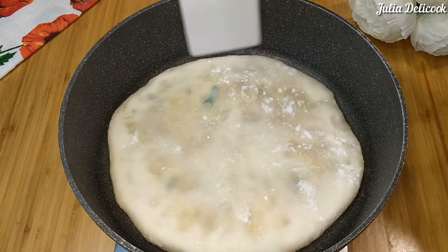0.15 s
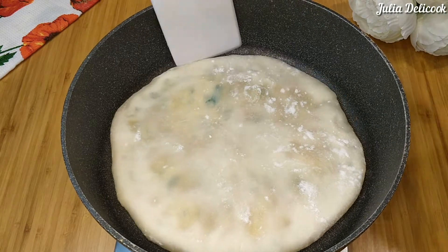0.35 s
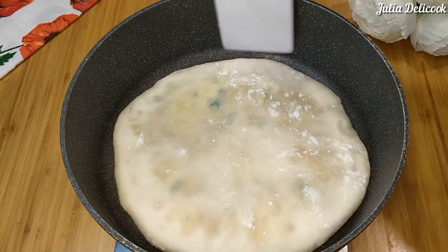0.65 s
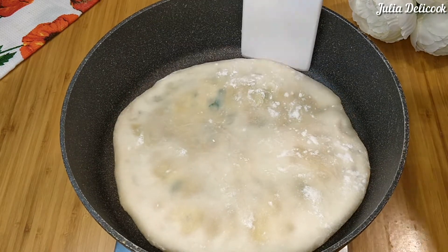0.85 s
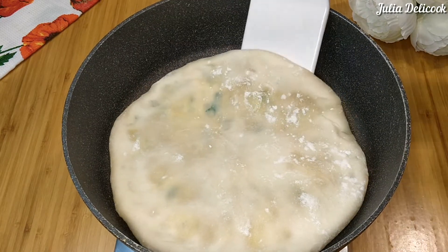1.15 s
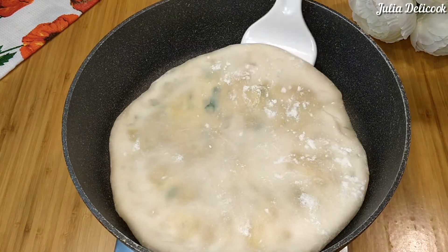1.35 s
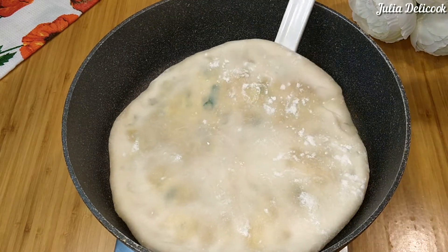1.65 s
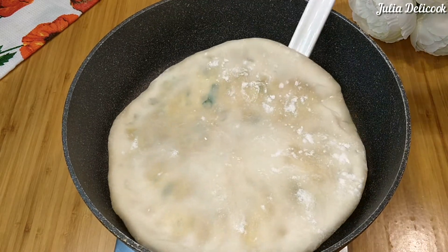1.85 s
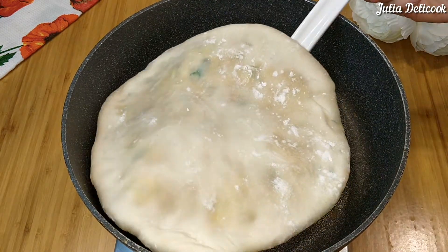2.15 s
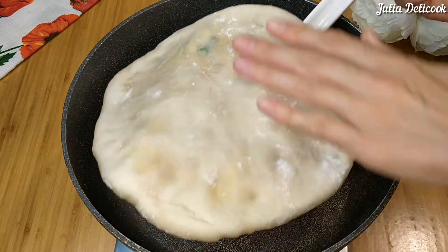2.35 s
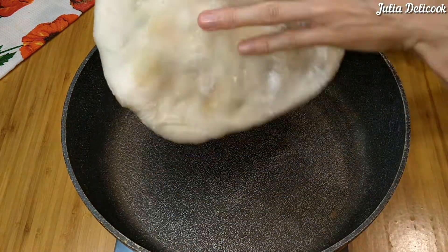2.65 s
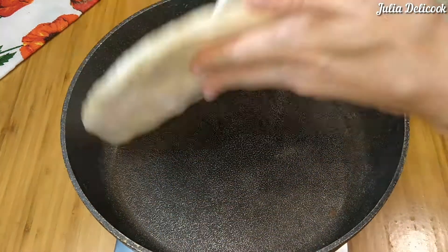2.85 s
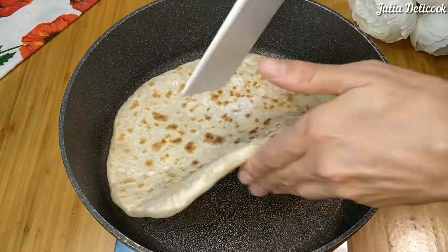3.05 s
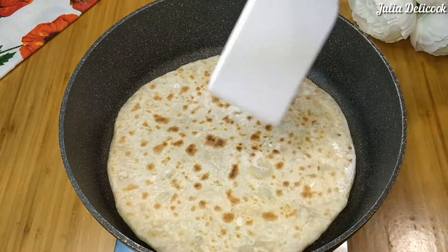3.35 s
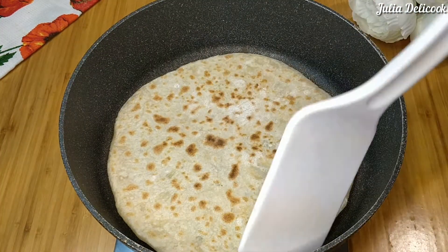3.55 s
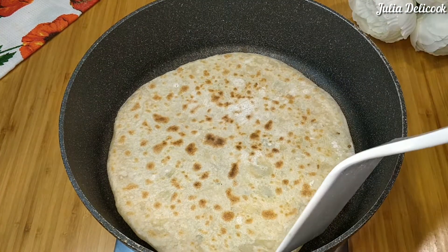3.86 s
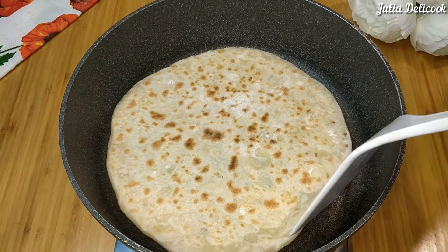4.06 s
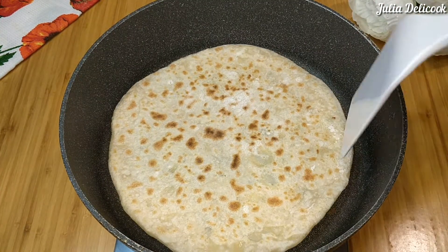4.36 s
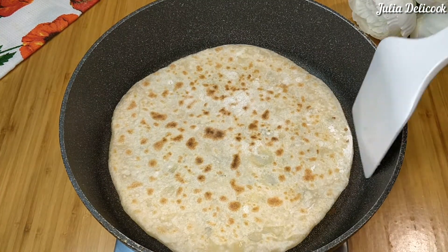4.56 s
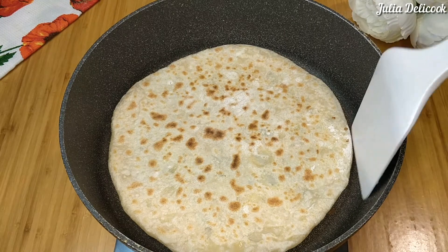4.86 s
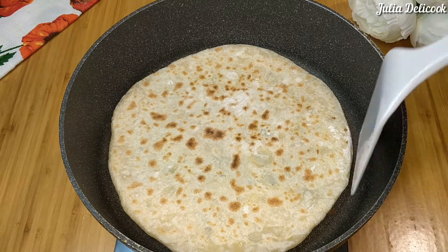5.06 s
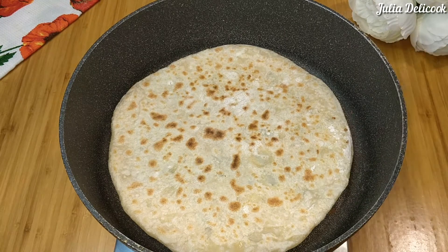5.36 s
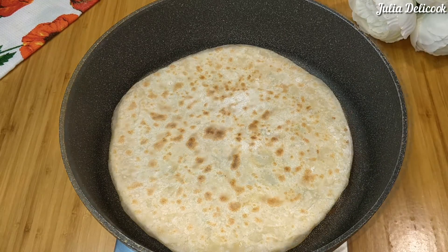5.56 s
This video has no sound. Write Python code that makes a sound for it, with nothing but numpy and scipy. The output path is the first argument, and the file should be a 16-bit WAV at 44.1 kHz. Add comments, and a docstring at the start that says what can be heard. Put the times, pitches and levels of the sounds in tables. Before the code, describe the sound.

Close stereo sound in a small kitchen with a short diffuse echo and a very faint, low room hush. From 0.1 to 1.7 s a plastic spatula works in a nonstick pan: irregular hard knocks with short, damped ringing and rough, grainy scrapes, clustered near 0.9 s and strongest around 1.4 s. A single dull low pop, mostly on the right, comes at 0.8 s. A knock at 1.85 s leads into a quiet stretch of faint floury brushing and dry ticks. At about 2.85 s the turned flatbread lands with a short brush and soft flops, settling again near 3.2 s. At 3.5 s the blade knocks and scrapes, then from 3.7 to 4.1 s judders in a low, buzzy, creaking groan of about sixty pulses a second. Separate taps and short scrapes follow at 4.1, 4.6 and 4.9 s, then very faint slides and soft settling until 5.5 s.

```python
"""Knocks, gritty scraping and a groaning judder: a plastic spatula works under a flatbread in a nonstick pan.
The bread is turned by hand and nudged into place: dry ticks, soft brushing, dull flops; one low pop is heard.
Blows and random slips ring the modes of pan and blade; stick-slip pulses ring the groan.
Filtered noise makes the brushing and the faint hush; a diffuse echo makes the small kitchen."""
import sys
import numpy as np
from scipy import signal
from scipy.fft import rfft, irfft, next_fast_len
from scipy.io import wavfile
from scipy.ndimage import uniform_filter1d

SR = 44100
rng = np.random.default_rng(int(sys.argv[2]) if len(sys.argv) > 2 else 0)


def master_out(mix):
    """Clip the mix to full scale and print it as 16-bit PCM to the path in sys.argv[1]."""
    frames = np.transpose(np.atleast_2d(mix))
    ceiling = np.clip(frames, -1, 1)
    pcm = np.round(ceiling * 32767).astype(np.int16)
    wavfile.write(sys.argv[1], SR, pcm)


N = 250929
T = np.arange(N) / SR
RING_T = T[:2 * SR // 5]  # 0.4 s

# Spatula knocks. Each row: time in s, base level in dB, brightness in dB per octave, extra pan wall in dB,
# extra hob thump in dB, extra edge tick in dB, chatter decay in s, three notes of the flexed blade in Hz.
KNOCKS = [(0.144, -32.5, -3.5, 3, -30, -5, 0.0048, 467, 1005, 3350),
          (0.356, -32.5, 0.5, 3.5, 2, 1, 0.0022, 517, 862, 3270),
          (0.627, -42.5, 4, -0.5, 0, 5, 0.0014, 479, 830, 2857),
          (0.672, -44.5, 2.5, -13.5, 15, -9, 0.0076, 576, 830, 3050),
          (0.893, -30, -2, -0.5, -22, 2, 0.0024, 520, 832, 2410),
          (0.903, -31.5, -4, 5.5, -2.5, 1, 0.011, 536, 984, 2210),
          (0.938, -31, -4, 0, -0.5, 3, 0.001, 385, 938, 4200),
          (1.188, -39.5, 2.5, 8.5, 13.5, 3, 0.0041, 474, 1177, 4160),
          (1.257, -32.5, 2.48, 3, 11, -5, 0.00065, 392, 1264, 6300),
          (1.4207, -26.5, 1.38, 4.5, 4.5, -1, 0.0068, 439, 1190, 5854),
          (1.852, -31.5, -2.5, 5, -1.5, -7, 0.0026, 422, 649, 4890),
          (3.533, -29, -2, -4.5, -13, 6, 0.0034, 418, 1497, 2460),
          (4.134, -35.5, 3.5, -1.5, 8.5, 0.5, 0.0059, 487, 646, 2617),
          (4.542, -39.5, 5, -11, -8, 5, 0.0037, 453.3, 1330, 3530),
          (4.619, -26.5, -8, -16, -42, -4, 0.00093, 411, 454.5, 2210),
          (4.858, -42.5, 1, -9.5, -23, 4, 0.0034, 460, 1020, 3350),
          (5.164, -50, 3, 4.5, -1, 6, 0.0079, 383, 840, 6930),
          (5.543, -71.5, 12, -0.5, 0, -10, 0.0034, 3190, 7200, 8460)]
# Slides of the blade on the coating. Each row: time of full force in s, attack in s, hold in s, release in s,
# base level in dB, brightness in dB per octave, extra pan wall in dB, extra blade ring in dB, blade note in Hz.
STROKES = [(0.134, 0.039, 0.021, 0.072, -34, .5, -1, 8, 448),
           (0.243, 0.037, 0.0063, 0.029, -42, 0.44, 1.5, 3.5, 453),
           (0.408, 0.11, 0.0089, 0.021, -42.5, -0.2, -0.5, -3, 478),
           (0.491, 0.061, 0.016, 0.3, -43.5, -1.3, 2, -13, 508),
           (0.606, 0.055, 0.028, 0.1, -34, 0.22, -3.5, 8.5, 557),
           (0.736, .03, .003, 0.042, -49, 1.5, -5.5, 5.5, 540),
           (0.834, 0.018, 0.012, 0.022, -41, -1.5, -11, -3, 382),
           (0.935, 0.074, 0.091, 0.027, -38.5, -0.5, 2.5, -6, 493),
           (1.02, 0.024, 0.032, 0.07, -37.5, 0, 4, 0, 498),
           (1.196, 0.072, 0.031, 0.04, -50.5, 0.2, 2, 2, 438),
           (1.297, 0.033, 0.051, 0.075, -38, -1, 7, -7, 407),
           (1.455, .04, 0.099, 0.063, -42, -0.7, 2.5, -11, 415),
           (1.544, .04, 0.014, 0.12, -34, -0.4, 7.5, -2.5, 408),
           (1.611, 0.075, 0.093, 0.075, -44, 0.97, 3, -3, 414),
           (3.561, 0.061, 0.081, 0.15, -47, -0.5, -1, 3, 353),
           (3.681, 0.024, 0.0056, 0.012, -32, -2, -3, 5, 364),
           (4.137, 0.082, 0.0082, .13, -43, 0.4, 7.5, 7, 448),
           (4.539, 0.009, 0.0086, 0.17, -48.5, -2, 2, 4, 434),
           (4.601, 0.017, 0.0094, 0.1, -40.5, -1, -6, -0.5, 406),
           (4.874, .015, 0.0058, 0.022, -47, -1, -17, -12, 427),
           (4.894, 0.03, 0.011, 0.058, -62.5, 3, 1.5, -2, 440),
           (4.978, 0.058, 0.027, 0.14, -69, 3, -8, -0.5, 446),
           (5.22, 0.075, .005, 0.11, -53, -0.5, 5, 5.5, 370),
           (5.307, 0.14, 0.013, 0.25, -60, 1.53, -2.5, 0, 384)]
# Pushes that make the blade judder along the pan wall. Each row: time of full force in s, attack in s,
# hold in s, release in s, level in dB.
JUDDER_PUSHES = [(3.75, 0.015, 0.15, 0.008, -32.5), (3.836, 0.04, .005, 0.039, -28.5),
                 (3.933, 0.019, 0.04, 0.046, -23.5), (4.002, 0.074, .14, 0.015, -26),
                 (4.026, 0.037, 0.048, 0.039, -22.5)]
# Floury bread brushing blade and pan. Each row: time of full force in s, attack in s, hold in s,
# release in s, level in dB.
BRUSHES = [(1.92, 0.24, .01, 0.28, -60), (2.04, .05, 0.032, 0.054, -66), (2.53, 0.053, .003, 0.035, -61.5),
           (2.72, 0.29, 0.074, .05, -67.5), (2.846, 0.021, 0.024, 0.021, -40),
           (2.9, 0.028, 0.027, 0.082, -51), (3.07, 0.1, 0.057, .12, -69.5), (3.218, 0.04, .002, .03, -55)]
# Bread settling. Each row: time in s, level in dB of hob, of pan bottom, of pan wall.
FLOPS = [(2.868, -44.5, -63, -45.5), (2.893, -49.5, -35, -49.5), (3.214, -59, -51, -52),
         (5.242, -46, -53, -76), (5.291, -51, -54, -70)]
# Dry crust ticks. Each row: time in s, level in dB.
TICKS = [(1.908, -50), (2.0294, -41.5), (2.5133, -44.5), (2.739, -48), (3.2173, -46), (3.803, -44)]
# Modes of the pan on its hob. Each row: frequency in Hz, relative level in dB, t60 in s.
PAN_MODES = [(73.9, 4.5, 0.41), (170.2, -5.5, 0.56), (370, -16, 0.066), (395.8, -2, 0.098),
             (458.9, -4, 0.2), (549, 4, 0.024), (559, -5.5, 0.16), (698, -2.5, 0.053), (772, -8, 0.15),
             (840, 0, 0.09), (931, -4, 0.083), (998.6, 0, 0.066), (1190, 0.5, 0.04), (1354.6, -3.5, 0.11),
             (1512, -22, 0.067), (1620, -33, 0.14), (2177, -9, 0.11), (2590, -14, 0.097), (2797, -7, 0.055),
             (3160, -4.5, 0.034), (3270, -15, 0.52), (3445, 4.5, 0.036), (3780, -3.5, 0.046),
             (4910, -7, .1), (5830, -11, 0.041), (5754, -12.5, 0.21), (6520, -6, 0.078), (6910, -6.5, 0.11),
             (7060, -1, 0.028), (8270, -5, 0.14)]
# Modes of the blade's groan against the pan. Each row: frequency in Hz, relative level in dB, t60 in s.
GROAN_MODES = [(172.5, -21, 0.47), (402.2, 1, 0.25), (456, -1.5, 0.13), (520.6, -6.5, 0.15),
               (597.5, -10.5, 0.07), (830, -14, 0.043), (1038, -26, 0.18), (1160, -16, 0.0083),
               (1427, -37, 0.14)]
# Registers of the ringing body: hob, pan bottom, pan wall, blade, coating, edge. Each row: low edge in Hz,
# high edge in Hz, dense modes relative to clear ones in dB, t60 of the dense modes in s.
REGISTERS = [(50.6, 305, -7, 0.25), (322, 743, -6, 0.048), (560, 2110, -3.5, 0.061),
             (2320, 3460, 3.5, 0.032), (3700, 9290, 10.5, 0.017), (11380, 17200, 0, 0.03)]
# Share of a knock in each register, in dB.
KNOCK_SHARES_DB = (-16.5, 0.5, -2.5, -13, -4.5, -23.5)
# Share of a stroke in each register, in dB.
STROKE_SHARES_DB = (-20, -3.5, -8.5, -16.5, -12, -20.5)
# Colour of the bread's brush. Each row: frequency in Hz, relative level in dB.
CRUST_COLOUR = [(300, -2.5), (1400, 0.5), (2500, -9.5), (5000, -2.5), (8000, -4), (10000, -14.5),
                (13000, -3.5), (16000, -6.5)]
# Colour of the kitchen hush. Each row: frequency in Hz, relative level in dB.
HUSH_COLOUR = [(15, -35), (25, -2), (76, -5.5), (120, -15), (161, -7.5), (200, -19.5), (309, -9.5),
               (451, -24), (591, -14), (754, -24.5), (887, -25.5), (2000, -36.5), (7310, -38.5),
               (8360, -38.5), (16000, -57)]
# Colour of the microphone. Each row: frequency in Hz, gain in dB.
MICROPHONE = [(700, 0), (1150, -3), (1700, -0.5), (2200, 0), (3300, 1.5), (4400, -1), (5500, -2),
              (8000, -1), (10500, -2), (13000, 0.5)]
# The two microphone ports. Each row: frequency in Hz, left minus right gain in dB.
BALANCE_DB = [(100, 1.5), (450, 0), (800, 6), (1300, 7.5), (2200, -1), (3300, 6.5), (6000, -1.5),
              (8200, -0.5), (10000, -1.5), (13000, 6.5), (16000, 17.5)]


def undb(db):
    """Decibels to gain."""
    return 10 ** (np.asarray(db) / 20)


def unit(x):
    """Scale to rms 1."""
    return x / np.sqrt(np.mean(x ** 2) + 1e-20)


def passband(lo, hi, order):
    """Sections of a Butterworth band-pass."""
    return signal.butter(order, [lo, min(hi, .45 * SR)], "band", fs=SR, output="sos")


def band(x, lo, hi, order):
    """Causal band-pass."""
    return signal.sosfilt(passband(lo, hi, order), x)


def colour(x, points):
    """Shape a spectrum by (Hz, dB) points, interpolated over log frequency."""
    hz, db = np.transpose(points)
    size = next_fast_len(N + len(RING_T))
    f = np.maximum(np.fft.rfftfreq(size, 1 / SR), 1)
    gain = undb(np.interp(np.log(f), np.log(hz), db))
    return irfft(rfft(x, size) * gain, size)[..., :N]


def pair(size, side):
    """Left and right noise with a common part."""
    mid, diff = rng.standard_normal((2, size))
    return unit(np.array([mid + side * diff, mid - side * diff]))


def ring(force, response):
    """Convolve a force with a response, cut to the force's length."""
    return signal.fftconvolve(np.atleast_2d(force), response, axes=-1)[:, :np.shape(force)[-1]]


def add(out, s, x):
    """Mix a sound in at time s."""
    i = int(s * SR)
    out[:, i:i + x.shape[-1]] += x[:, :N - i]


def fade(t60):
    """Exponential decay."""
    return np.exp(-np.log(1000) * RING_T / max(t60, 1e-3))


def gesture(t, s, attack_s, hold_s, release_s):
    """Gain of one push: gains 20 dB per attack time, holds, loses 20 dB per release time."""
    early = np.maximum(s - t, 0)
    late = np.maximum(t - s - hold_s, 0)
    steps = early / max(attack_s, 1e-3) + late / max(release_s, 1e-3)
    return undb(-20 * np.minimum(steps, 10))


def gestures(rows):
    """Gain of a table of pushes, added in power."""
    return np.sqrt(sum((undb(db) * gesture(T, *shape)) ** 2 for *shape, db in rows))


def tilt(db_per_octave, pivot_hz=456):
    """Level offset of each register in dB, sloping about the pivot."""
    return db_per_octave * np.log2([np.sqrt(lo * hi) / pivot_hz for lo, hi, *_ in REGISTERS])


def hush(level_db=-61.5, waver_db=1):
    """Faint room noise, partly common to both sides, its level wavering a little."""
    air = unit(colour(pair(N, side=0.48), HUSH_COLOUR))
    waver = unit(band(rng.standard_normal(N), 0.11, 10, order=1))
    return air * undb(level_db + waver_db * waver)


def kitchen(x, wet_db=-13, low_t60=0.39, high_t60=0.32, build_s=0.0068):
    """Short diffuse echo of a small, hard room: decaying noise, nearly mono in the bass."""
    high = band(pair(len(RING_T), side=0.79), 500, 14040, order=1) * fade(high_t60)
    low = band(pair(len(RING_T), side=0.1), 100, 410, order=1) * fade(low_t60)
    tail = (high + low) * (1 - np.exp(-(RING_T / build_s) ** 2))
    return x + undb(wet_db) * ring(x, tail / np.linalg.norm(tail[0]))


def low_pop(s=.812, ports_db=(-38, -21.5), snap_s=.00005, sag=0.29, sag_s=0.0028, fall_s=.016):
    """One dull pop, mostly on the right: the pressure sags a little, snaps up and relaxes."""
    t = T - s
    shape = np.where(t < 0, sag * np.exp(-np.abs(t) / sag_s), np.exp(-np.abs(t) / fall_s))
    return undb(ports_db)[:, None] * np.tanh(t / snap_s) * shape


def ringing(table):
    """Each mode of a table as a decaying sine; alternate rows have opposite sign."""
    return [(hz, (-1) ** k * undb(db) * fade(t60) * np.sin(2 * np.pi * hz * RING_T))
            for k, (hz, db, t60) in enumerate(table)]


def pan_body(modes, note_db=4, note_t60=0.11, place_db=2.0):
    """Pan and blade together: returns a function giving the register responses of one contact spot."""
    note = undb(note_db) * fade(note_t60)
    registers = [(lo, hi, undb(dense_db), fade(dense_t60),
                  passband(lo, hi, order=3), passband(0.74 * lo, 0.86 * hi, order=2))
                 for lo, hi, dense_db, dense_t60 in REGISTERS]

    def spot(notes_hz=()):
        """Pan modes, the flexed blade's notes, and dense damped modes as decaying noise."""
        tones = modes + [(hz, note * np.cos(2 * np.pi * hz * RING_T)) for hz in notes_hz]
        # each spot pushes the modes a little differently
        pushes = undb(place_db * rng.standard_normal(len(tones)))
        body = []
        for lo, hi, dense_gain, decay, inner, outer in registers:
            clear = unit(sum(push * tone for push, (hz, tone) in zip(pushes, tones) if lo <= hz < hi))
            # short waves reach the two ports out of step
            noise = pair(len(RING_T), side=min(0.38 + lo / 4000, 1))
            dense = unit(signal.sosfilt(inner, noise * decay))
            body.append(signal.sosfilt(outer, clear + dense_gain * dense))
        return body
    return spot


def strike(force, response, db):
    """A blow into one register, its loudest 8 ms at the given level."""
    x = ring(force, response)
    power = uniform_filter1d(np.mean(x ** 2, axis=0), size=353)
    return x * undb(db) / np.sqrt(power.max())


def bread(body, grain_db=4, tick_t60=0.013):
    """Floury crust brushes and ticks as grainy noise; soft dough flops as blows on hob and pan."""
    dry = unit(pair(N, side=1.0) * undb(grain_db * rng.standard_normal(N)))
    contact = gestures(BRUSHES)[None]
    for s, db in TICKS:
        add(contact, s, undb(db) * fade(tick_t60)[None])
    out = unit(colour(band(dry, 330, 15700, order=1), CRUST_COLOUR)) * contact
    blow = 1. * (RING_T == 0)
    for s, *levels_db in FLOPS:
        for db, response in zip(levels_db, body):
            add(out, s, strike(blow, response, db))
    return out


def judder(slip_hz=57.8, jitter=0.0492, scatter_db=2, rub_share=.35, low_hz=300, soft_hz=1100,
           hiss_db=-34, grain_db=4):
    """The flexing blade sticks and slips some sixty times a second, groaning against the pan."""
    t = T[:SR // 2]
    chance = rng.standard_normal((40, 2))
    times = np.cumsum(np.exp(jitter * chance[:, 0])) / slip_hz
    slips = np.histogram(times, len(t), (0, t[-1]), weights=undb(scatter_db * chance[:, 1]))[0]
    rub = rub_share * np.sqrt(slip_hz / SR) * rng.standard_normal(len(t))
    force = band(slips + rub, low_hz, soft_hz, order=1)
    groan = ring(force, sum(tone for hz, tone in ringing(GROAN_MODES))[None])
    # level the swing: the hand's pressure alone sets its size
    power = uniform_filter1d(uniform_filter1d(groan ** 2, size=1100), size=1100)
    groan /= np.sqrt(power + 1e-9)
    # the grainy coating hisses under the sliding edge
    grains = pair(len(t), side=0.89) * undb(grain_db * rng.standard_normal(len(t)))
    hiss = unit(band(grains, 760, 9200, order=2))
    out = np.zeros((2, N))
    first_s, first_attack_s = JUDDER_PUSHES[0][:2]
    add(out, first_s - 2 * first_attack_s, groan + undb(hiss_db) * hiss)
    return out * gestures(JUDDER_PUSHES)


def scraping(spot, grains_per_s=1100, spread_db=5, patchy_db=0.5, stutter=0.28, pressed_t60=0.34,
             force_powers=(.7, 1.01, 1.05, 1.3, 1.05, 1.05)):
    """The edge catches on the coating: uneven patchy slips ring each register by a power of the force."""
    slips = (rng.random(N) < grains_per_s / SR) * rng.choice([-1, 1], N)
    slips = slips * undb(spread_db * rng.standard_normal(N))
    # the pressed blade damps the ringing
    damping = fade(pressed_t60)[:len(RING_T) // 2]
    patches = unit(band(rng.standard_normal(N), 40, 113, order=1))
    out = np.zeros((2, N))
    for s, attack_s, hold_s, release_s, db, bright_db, wall_db, blade_db, note_hz in STROKES:
        span = (T > s - 3 * attack_s) & (T < s + hold_s + 2 * release_s + RING_T[-1] / 2)
        force = gesture(T[span], s, attack_s, hold_s, release_s)
        # a blade that rings freely stutters more
        depth_db = patchy_db + stutter * max(blade_db, 0)
        grit = unit(slips[span] * undb(depth_db * patches[span]))
        levels_db = db + tilt(bright_db) + STROKE_SHARES_DB + [0, 0, wall_db, blade_db, 0, 0]
        for level_db, power, response in zip(levels_db, force_powers, spot((note_hz,))):
            damped = response[:, :len(damping)] * damping
            gain = undb(level_db) / np.linalg.norm(damped.mean(axis=0))
            add(out, T[span][0], ring(grit * force ** power, damped) * gain)
    return out


def knocks(spot, chatter_size=0.042):
    """The blade lands and chatters for a few ms; the lowest register feels only the first push."""
    out = np.zeros((2, N))
    for s, db, bright_db, wall_db, hob_db, edge_db, chatter_s, *notes_hz in KNOCKS:
        levels_db = db + tilt(bright_db) + KNOCK_SHARES_DB + [hob_db, 0, wall_db, 0, 0, edge_db]
        decay = np.exp(-RING_T / max(chatter_s, 1e-4))
        chatter = chatter_size * rng.standard_normal(len(RING_T)) * decay
        for k, response in enumerate(spot(notes_hz)):
            # chatter grows with the register
            force = (RING_T == 0) + k * chatter
            add(out, s, strike(force, response, levels_db[k]))
    return out


def scene():
    """Pan, spatula and bread in the kitchen, heard at two ports, plus pop and hush."""
    spot = pan_body(ringing(PAN_MODES))
    contacts = knocks(spot) + scraping(spot) + judder() + bread(spot())
    left, right = colour(kitchen(contacts), MICROPHONE)
    half = np.array(BALANCE_DB) * [1, .5]
    ports = np.array([colour(left, half), colour(right, half * [1, -1])])
    return ports + low_pop() + hush()


def record(dry, top_hz=16100):
    """The recorder cuts the top: steep elliptic low-pass."""
    return signal.sosfilt(signal.ellip(10, .2, 80, top_hz, fs=SR, output="sos"), dry)


dry = scene()
out = record(dry)
master_out(out)
```